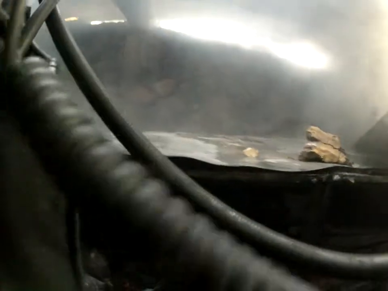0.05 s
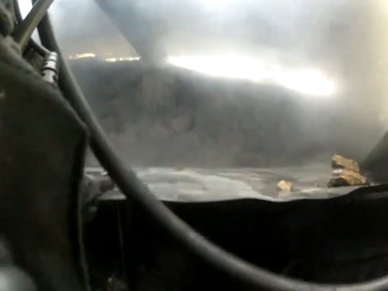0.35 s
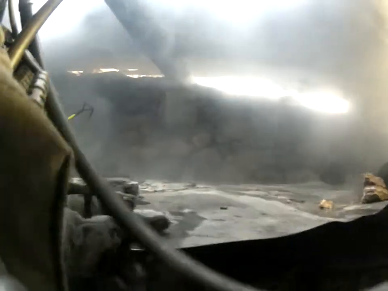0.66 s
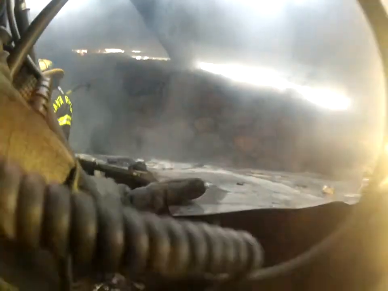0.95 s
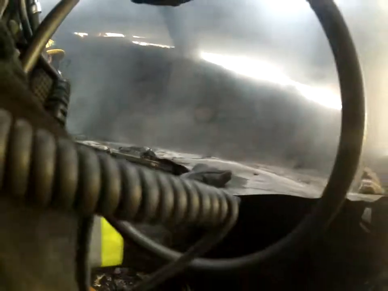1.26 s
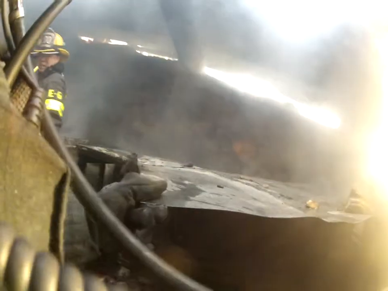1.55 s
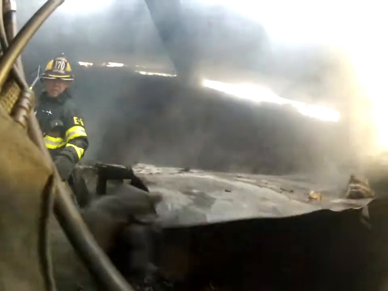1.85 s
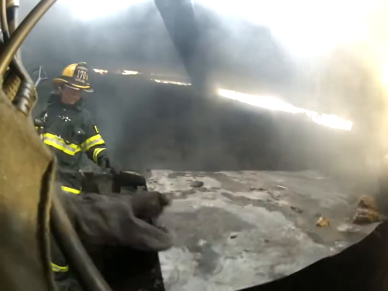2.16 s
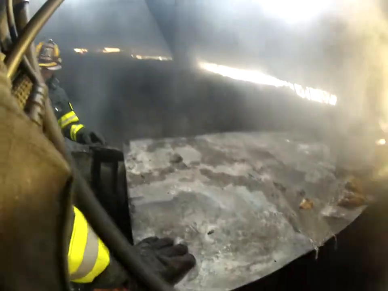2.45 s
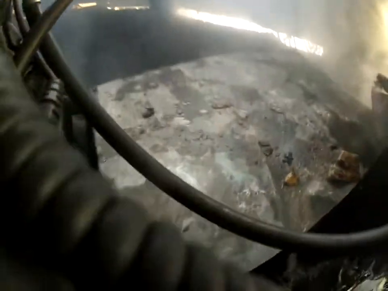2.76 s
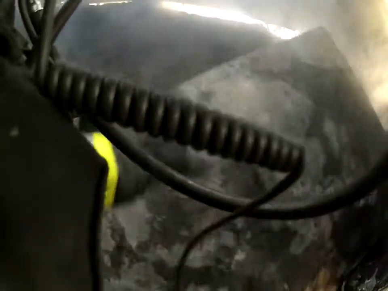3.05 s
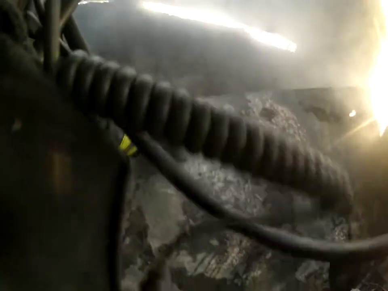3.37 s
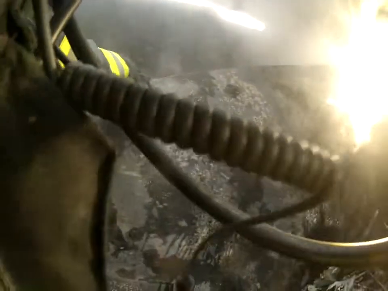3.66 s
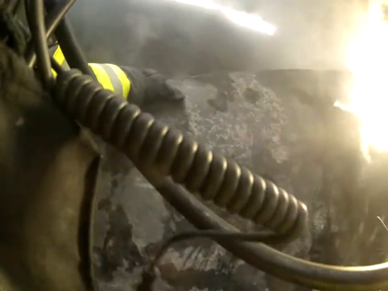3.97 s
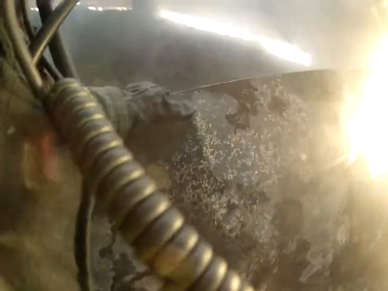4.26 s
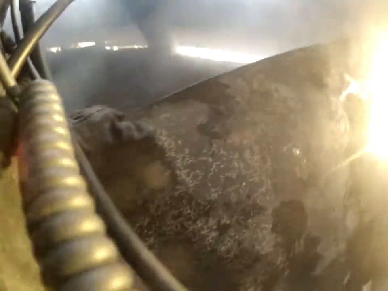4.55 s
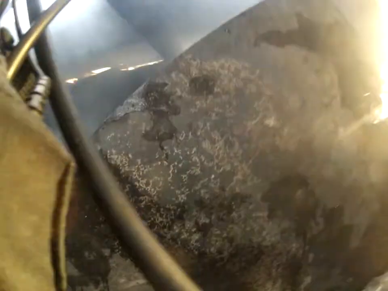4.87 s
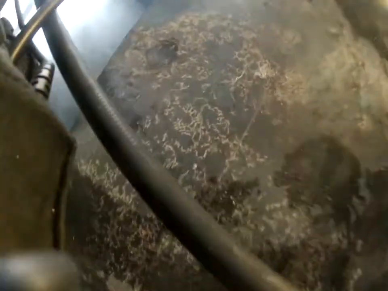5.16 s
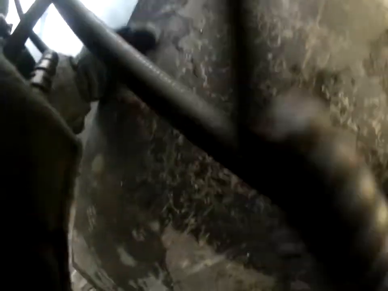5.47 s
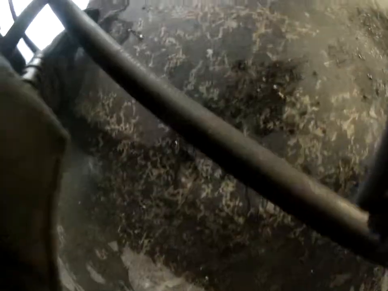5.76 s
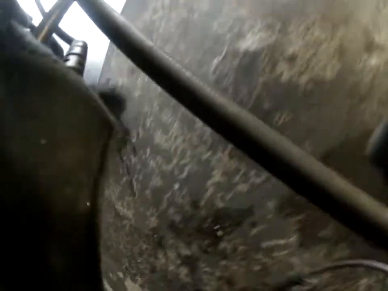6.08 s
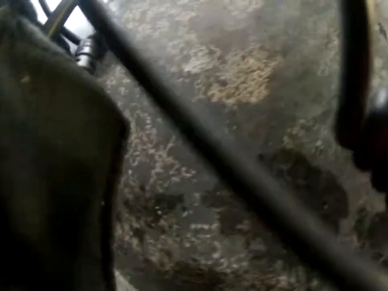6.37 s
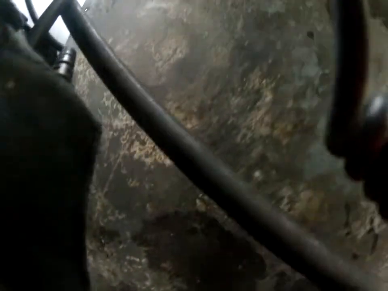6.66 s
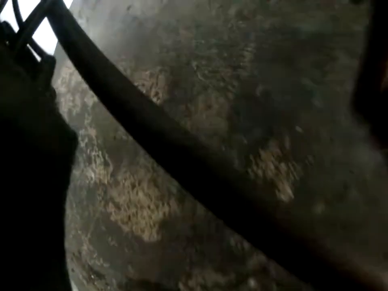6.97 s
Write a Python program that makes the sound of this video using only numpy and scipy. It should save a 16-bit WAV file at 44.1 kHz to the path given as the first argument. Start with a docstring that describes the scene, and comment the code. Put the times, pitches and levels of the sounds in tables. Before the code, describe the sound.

A faint, wavering hiss and the low rub of shifting gear run throughout, heard very close on a helmet camera inside a burned building. Two hard clacks hit the housing around 0.4 seconds, followed by soft bumps, short scrapes and small metal clinks, with another knock at 2.5 seconds. At about 3 seconds a fitting clinks, a metal sheet knocks dully, and grit slides off it in a rush that rings the sheet and fades by 3.9 seconds. After a few soft thumps, a sharp knock at 4.8 seconds starts a busy run of clacks and scrapes, strong near 5.3 and 5.7 seconds. From 6 seconds a hose judders across the camera in stuttering thuds while the cloth rubbing grows. A cluster of loud knocks comes at about 7 seconds. The hardest hits overload, briefly dip the level and have a gritty treble edge.

```python
"""Inside a burned building, heard from a helmet camera. Over a faint hiss and the rub of shifting gear,
fittings clink, soft bumps thump the camera, a hose judders across it and hard gear clacks on its housing.
Midway, a tilted metal sheet knocks, and grit slides off it in a brief rush that sets it ringing.
The recorder overloads on the knocks, ducks after them, and holds each sample,
which mirrors the sound into the treble."""
import sys
import numpy as np
from scipy import signal
from scipy.fft import rfft, irfft, next_fast_len
from scipy.io import wavfile
from scipy.ndimage import map_coordinates

SR = 44100
rng = np.random.default_rng(int(sys.argv[2]) if len(sys.argv) > 2 else 0)


def store_wav(level_fs):
    """Save 16-bit WAV to argv[1]."""
    pcm = np.round(np.clip(np.atleast_2d(level_fs), -1, 1) * 32767)
    wavfile.write(sys.argv[1], SR, pcm.T.astype(np.int16))


N = 313992


def amp(db):
    """Decibels to gain."""
    return 10 ** (np.asarray(db) / 20)


def unit(x):
    """Scale to rms 1."""
    return x / np.sqrt(np.mean(x ** 2) + 1e-20)


def colour(points, hz):
    """An EQ curve: the gain of (Hz, dB) points joined on a log axis."""
    freqs, db = np.transpose(points)
    return amp(np.interp(np.log(hz + 1), np.log(freqs + 1), db))


def curves(rows):
    """Fader moves: one value per sample for each column after the time."""
    times, *columns = np.transpose(rows)
    return [np.interp(np.arange(N) / SR, times, column) for column in columns]


def wobble(rate):
    """A smooth random curve, rate knots a second."""
    knots = rng.standard_normal(int(N * rate / SR) + 4)
    return map_coordinates(knots, [np.arange(N) * rate / SR])


def filtered(x, response):
    """Shape x by a gain that depends on frequency."""
    size = next_fast_len(len(x) + 8192)
    return irfft(rfft(x, size) * response(np.fft.rfftfreq(size, 1 / SR)), size)[:len(x)]


def add(track, start, sound):
    """Mix a sound into the track, start seconds in."""
    part = track[max(round(start * SR), 0):][:len(sound)]
    part += sound[:len(part)]


def grains(size, rate, spread_db):
    """Tiny random contacts of uneven strength, rate a second, rms 1."""
    hit = rng.random(size) < rate / SR
    return unit(hit * rng.standard_normal(size) * amp(spread_db * rng.standard_normal(size)))


def ring(t, hz, t60, attack):
    """One damped mode; t60 and attack in seconds."""
    return np.sin(2 * np.pi * hz * t) * amp(-60 * t / t60) * (1 - np.exp(-t / attack))


# tone of the hiss (frequency [Hz], gain [dB])
HISS_EQ = [(300, -1), (900, -6.5), (1100, 4.5), (1400, 0), (1640, 11), (1880, 2), (2100, 8), (2400, 8),
           (2700, 4.5), (3100, -2.5), (3550, 1), (4200, -13.5), (5300, -8), (6000, -15.5)]

def hiss(level_db=-39.5, waver_db=1.62):
    """A thin, restless bed, coloured by the cavity at the microphone; it sinks when the gear is still."""
    _, rub_db = curves(np.vstack(GEAR_MOVES))
    lull_db = 0.85 * np.minimum(rub_db + 45.5, 0)
    air = unit(filtered(rng.standard_normal(N), lambda hz: colour(HISS_EQ, hz)))
    return air * amp(level_db + lull_db + waver_db * wobble(rate=9.4))


# tone of the mount's rumble and of the cloth on it (frequency [Hz], gain [dB])
SWAY_EQ = [(12, -64), (30, -2), (60, -6), (110, -11), (180, -18), (400, -40.5), (800, -68)]
RUB_EQ = [(60, -35), (120, 8), (165, 8.5), (230, 11), (320, 3), (500, -3), (750, -4.5), (1100, -5.5),
          (1500, -37.5), (4000, -35.5), (6000, -66)]
# gear shifting, one list before the grit slide and one after (time [s], sway fader [dB], rub fader [dB])
GEAR_MOVES = [
    [(0.0, -41.5, -47.5), (0.24, -46, -50), (0.66, -38.5, -39), (0.84, -54, -46), (1.02, -46.5, -44.5),
     (1.43, -44, -46), (1.6, -44, -49), (1.94, -35.5, -45), (2.07, -39.5, -36), (2.26, -39, -50.5),
     (2.52, -55, -50.5), (2.83, -51, -48.5), (3.0, -44, -47)],
    [(3.75, -46.5, -47.5), (4.02, -47.5, -54.5), (4.19, -47.5, -46), (4.36, -49, -42), (4.65, -37.5, -48.5),
     (4.84, -33.5, -37), (5.18, -41, -38), (5.75, -39, -38), (5.97, -60, -27.5), (6.24, -37, -27.5),
     (6.52, -36.5, -37.5), (6.72, -43, -44), (7.12, -34, -23)],
]

def handling(sway_trim_db=2.5, rub_trim_db=-0.5):
    """The mount sways in lumps, and cloth rubs on it in the same uneven pushes."""
    sway_db, rub_db = curves(np.vstack(GEAR_MOVES))
    push = wobble(rate=19)
    sway = unit(filtered(rng.standard_normal(N), lambda hz: colour(SWAY_EQ, hz)))
    rub = unit(filtered(grains(N, rate=1100, spread_db=1), lambda hz: colour(RUB_EQ, hz)))
    sway *= amp(sway_db + sway_trim_db + 5.5 * push)
    rub *= amp(rub_db + rub_trim_db + 2.8 * push)
    return sway + rub


# modes of a metal fitting (frequency [Hz], level [dB], t60 [s])
FITTING_MODES = [(2700, 5, 0.11), (2930, 15, 0.018), (3614, 16.5, 0.028), (4030, 9, 0.036),
                 (4230, 4, 0.017), (5710, 8.5, 0.025)]
# fittings touching (time [s], gain [dB], pitch [ratio])
CLINK_CUES = [(.862, -47, 1), (0.884, -47, 1), (0.976, -52, 1.44), (1.6865, -38.5, 0.78),
              (1.697, -45, 0.63), (3.0057, -31.5, 0.93), (3.9083, -46.5, 0.94), (3.9935, -48, 0.9),
              (6.91, -37, 0.92)]

def clinks():
    """A small metal fitting rings briefly, with a new balance of modes at every touch."""
    out, t = np.zeros(N), np.arange(SR // 8) / SR
    for start, gain_db, pitch in CLINK_CUES:
        scatter_db = 2 * rng.standard_normal(len(FITTING_MODES))
        tones = [amp(db + offset_db) * ring(t, hz * pitch, t60, attack=0.000074)
                 for (hz, db, t60), offset_db in zip(FITTING_MODES, scatter_db)]
        add(out, start, amp(gain_db - 0.5) * sum(tones))
    return out


# tone of contact noise heard through the housing (frequency [Hz], gain [dB])
CONTACT_EQ = [(60, 15.5), (200, 12), (500, 4), (800, -8.5), (1100, -5.5), (1350, -8.5), (1650, -3.5),
              (2000, -8.5), (2600, -4), (3100, -12.5), (3500, -7), (4300, -15.5), (6000, -15.5)]
# short noisy sounds: scrapes, jingling fittings, a crack of grit, a thud's low ring
# (time [s], length [s], opening level [dB], centre [Hz], width [octaves])
BURST_CUES = [(0.806, 0.064, -30.5, 248, 2.7), (1.024, 0.039, -31.5, 410, 0.72),
              (1.22, 0.018, -24.5, 1820, 1.17), (1.961, 0.027, -25.5, 600, 7.5),
              (2.292, 0.033, -37, 2600, 1.2), (3.004, 0.045, -29, 3400, 1.34),
              (3.178, 0.032, -21, 4630, 0.83), (3.989, 0.098, -42, 3430, 0.65),
              (4.186, 0.028, -33.5, 335, 0.19), (4.345, 0.062, -34.5, 217, 0.46),
              (4.436, 0.039, -30, 450, 1.1), (5.28, 0.055, -23, 1140, 1.05),
              (5.46, 0.088, -25.5, 1390, 0.75), (5.809, 0.09, -22.5, 950, 1.36),
              (5.83, 0.1, -28.5, 230, 0.88), (6.044, 0.027, -22, 770, 0.35),
              (6.296, 0.034, -21.5, 1240, 0.78), (6.312, 0.025, -11, 159, 0.18),
              (6.99, 0.096, -19.5, 1400, 1.1)]

def noisy_bursts(fade_db=5.5):
    """Each short noisy sound is a fading run of tiny contacts, filtered to its own band."""
    out, t = np.zeros(N), np.arange(SR // 4) / SR
    for start, length, db, centre_hz, octaves in BURST_CUES:
        band = lambda hz: np.exp(-0.5 * (np.log2((hz + 1) / centre_hz) / octaves) ** 2)
        contacts = grains(len(t), rate=3600, spread_db=1)
        burst = unit(filtered(contacts, lambda hz: band(hz) * colour(CONTACT_EQ, hz)))
        envelope = (1 - np.exp(-t / 0.00033)) * np.exp(-np.maximum(t - length, 0) / 0.0078)
        add(out, start, burst * envelope * amp(db - fade_db * np.minimum(t / length, 1)))
    return out


def patter(rate, decay_s, spots):
    """Grains land on a few spots of the metal; each spot has its own brief, dense ring."""
    age = np.arange(SR // 20) / SR
    rings = rng.standard_normal((spots, len(age))) * np.exp(-age / decay_s)
    return sum(signal.oaconvolve(grains(N, rate, spread_db=2), spot)[:N] for spot in rings)


# resonances of the metal sheet (frequency [Hz], width [Hz], level [dB])
SHEET_MODES = [(342, 28, -10.5), (671, 34, 4.5), (1130, 27, 0), (1693, 130, -2), (2480, 380, -5),
               (3460, 210, -16)]
# tone of the grit (frequency [Hz], gain [dB])
GRIT_EQ = [(60, -15), (150, 7), (300, 4), (450, 0.5), (650, -4), (870, -6), (1100, -2), (1400, -2.5),
           (1700, -6.5), (2600, -12), (3600, -16), (4500, -22.5), (6000, -21)]
# swell of each grain size, coarse to fine (peak delay [s], peak level [dB], rise [dB/s], fall [dB/s])
GRIT_SWELLS = [(0.12, -20.5, 53, 52.5), (0.22, -28.5, 54, 49), (0.16, -29, 20, 37)]

def grit_slide(start_s=3.068, end_s=3.85, attack_s=0.0047, release_s=0.068):
    """Grit pours off the tilted sheet and rings it: each grain size swells to its own peak, then thins."""
    def sheet(hz):
        modes = sum(amp(db / 2) / (1 + 2j * (hz - centre) / width) for centre, width, db in SHEET_MODES)
        return 0.47 + np.abs(modes) ** 2

    out, age = np.zeros(N), np.arange(N) / SR - start_s
    pouring = np.clip(np.minimum(age / attack_s, (end_s - start_s - age) / release_s), 0, 1)
    contacts = patter(rate=220, decay_s=0.0067, spots=8)
    edges_hz = [125, 800, 2500, 6000]  # one band per grain size
    for (delay, peak_db, rise, fall), low, high in zip(GRIT_SWELLS, edges_hz, edges_hz[1:]):
        level_db = peak_db - np.maximum(rise * (delay - age), fall * (age - delay))
        band = lambda hz: 1 / np.sqrt((1 + (low / (hz + 1)) ** 8) * (1 + (hz / high) ** 8))
        rush = unit(filtered(contacts, lambda hz: colour(GRIT_EQ, hz) * sheet(hz) * band(hz)))
        out += amp(level_db) * rush
    return out * pouring


# modes of the camera's plastic shell (frequency [Hz], level [dB], t60 [s])
SHELL_MODES = [(607, -6.5, 0.034), (993, 3, 0.009), (1554, -2.5, 0.019), (2177, -2, 0.0092),
               (2702, -10, 0.017), (3500, -16.5, 0.02), (4530, -13.5, 0.0019)]

def blow(thud_hz, thud_db, panel_hz, panel_db, shell_db, thud_cycles):
    """A blow rocks the camera on its mount, rings the struck panel and rattles the whole shell."""
    t = np.arange(SR // 10) / SR
    scatter = rng.standard_normal(len(SHELL_MODES))
    thud = amp(thud_db) * ring(t, thud_hz, t60=thud_cycles / thud_hz, attack=0.43 / thud_hz)
    # higher panel modes die sooner
    panel = amp(panel_db) * ring(t, panel_hz, t60=0.011 * (1200 / panel_hz) ** 0.29, attack=0.00044)
    shell = sum((-1) ** k * amp(db + 3.85 * scatter[k]) * ring(t, hz, t60, attack=0.00003)
                for k, (hz, db, t60) in enumerate(SHELL_MODES))
    # the surfaces chatter for a few milliseconds, too soft to give much top end
    chatter_eq = lambda hz: colour(CONTACT_EQ, hz) / np.hypot(1, (hz / 3500) ** 4)
    chatter = unit(filtered(rng.standard_normal(len(t)), chatter_eq))
    chatter *= (amp(panel_db - 17.5) + amp(shell_db - 4.5)) * np.exp(-t / 0.0033)
    # the helmet under the mount adds a soft, low tail
    helmet = amp(thud_db - 27) * ring(t, hz=158 * np.exp(0.204 * scatter[0]), t60=0.063, attack=0.0073)
    # the small housing gives off little bass
    low_cut = signal.butter(2, 464, "high", fs=SR, output="sos")
    housing = signal.sosfilt(low_cut, panel + amp(shell_db) * shell + chatter)
    return -(thud + housing + helmet)


def soft_blow(thud_hz, thud_db):
    """A dull blow is mostly thud; panel and shell answer faintly."""
    answer_db = 0.7 * thud_db
    panel_hz = 1102 * np.exp(0.36 * rng.standard_normal())
    return blow(thud_hz, thud_db, panel_hz, answer_db - 18, answer_db - 29, thud_cycles=3.14)


def cord_taps(per_second=4.2, thud_hz=216, over_rub_db=21, spread_db=2):
    """The dangling cord taps at random, harder when the gear shifts more."""
    out = np.zeros(N)
    _, rub_db = curves(np.vstack(GEAR_MOVES))
    count = round(per_second * N / SR)
    for at, (pitch, strength) in zip(rng.integers(N, size=count), rng.standard_normal((count, 2))):
        thud_db = rub_db[at] + over_rub_db + spread_db * strength
        add(out, at / SR, soft_blow(thud_hz * np.exp(0.35 * pitch), thud_db))
    return out


# dull thumps (time [s], thud pitch [Hz], thud level [dB])
THUMP_CUES = [(0.5125, 387, 8.5), (0.6493, 360, 1.5), (1.1381, 78, -5.5), (1.5125, 99, -12.5),
              (2.006, 81.5, -4), (2.0576, 102, -3.5), (2.183, 124, -10.5), (3.075, 226, 0),
              (4.296, 141, -10.5), (4.4361, 397, -5), (4.691, 135, -2), (4.762, 72, -3), (5.517, 120, -2.5),
              (5.9756, 245, 6.5), (6.1075, 500, 5.5), (6.201, 174, -1), (6.3925, 272, 4.5),
              (6.7074, 186, 4)]

def dull_thumps():
    """Soft bumps on the camera, and the sheet's knock as the grit starts sliding."""
    out = np.zeros(N)
    for start, hz, db in THUMP_CUES:
        add(out, start, soft_blow(hz, db))
    return out


# the hose catching on the housing (time [s], first thud pitch [Hz], first thud level [dB])
JUDDER_CUES = [(6.0519, 268, 11), (6.1205, 273, 16), (6.2964, 276, 13.5), (6.9929, 323, 5)]

def hose_judders(slips=3, gap_s=0.0096, jitter_s=0.00103, pitch_ratio=0.79, loss_db=1.5):
    """The hose sticks and slips as its tension lets go, each slip lower and weaker than the last."""
    out = np.zeros(N)
    for start, hz, db in JUDDER_CUES:
        for k in range(slips):
            slip_time = start + k * gap_s + min(k, 1) * jitter_s * rng.standard_normal()
            add(out, slip_time, soft_blow(hz * pitch_ratio ** k, db - k * loss_db))
    return out


# hard hits on the housing
# (time [s], thud pitch [Hz], thud level [dB], panel pitch [Hz], panel level [dB], shell gain [dB])
KNOCK_CUES = [(0.1503, 300, -20, 1060, -15, -23), (0.3933, 300, 20, 1330, 11, 3),
              (0.4532, 380, 19.5, 1460, -5, -5.5), (1.145, 171, -15, 1625, 2, -15),
              (1.5736, 750, -15, 2510, -0.5, -5.5), (1.7958, 428, -37, 1000, -8.5, -19),
              (1.8903, 140, -1, 2240, -10, -24), (2.5313, 406, 10, 1020, 7, -7),
              (4.803, 303, 20, 2554, 18, 0.5), (4.837, 603, 10, 1080, 1.5, -28),
              (4.8553, 210, -4, 1040, -5.5, -15.5), (4.901, 255, 5.5, 782, -2.5, -19.5),
              (5.0112, 350, 4, 1704, 8.5, -14.5), (5.0404, 167, -6.5, 940, -10, -33),
              (5.223, 231, -4, 980, -5.5, -21.5), (5.2763, 282, 6.5, 704, 2.5, -4.5),
              (5.3051, 470, 16, 1110, 3.5, -10), (5.3306, 241, 12.5, 1860, 12, -7),
              (5.623, 251, -4, 1860, -8.5, -20), (5.683, 347, 22, 1063, 16.5, -0.5),
              (5.758, 403, 3.5, 1130, 0, -13), (5.8253, 275, 17.5, 1600, 2.5, -8.5),
              (6.4195, 263, 13.5, 1002, 16.5, 1), (6.4984, 222, 10, 750, -4.5, -12),
              (6.817, 216, 13, 1016, -2.5, -47), (7.0447, 423, 14.5, 1240, 0, -12),
              (7.0507, 447, 7, 1050, 4.5, 2.5), (7.0655, 148, 21, 2530, 19.5, 5),
              (7.1165, 300, 24, 1746, 25.5, -11)]

def gear_knocks():
    """Hard gear clacks on the housing, each time on a different spot with its own pitch."""
    out = np.zeros(N)
    for start, thud_hz, thud_db, panel_hz, panel_db, shell_db in KNOCK_CUES:
        add(out, start, blow(thud_hz, thud_db, panel_hz, panel_db, shell_db, thud_cycles=2.37))
    return out


def scene():
    """Hits and textures meet at one microphone, which feeds both channels."""
    hits = gear_knocks() + dull_thumps() + hose_judders() + clinks()
    mono = hits + noisy_bursts() + handling() + hiss() + grit_slide() + cord_taps()
    return np.array([mono, mono])


def duck(x, threshold, depth, release_s, lag_s):
    """Gain control: a moment after an overload the gain drops, then creeps back."""
    overshoot = np.clip(np.abs(x) - threshold, 0, 1)
    pole = np.exp(-1 / (release_s * SR))
    envelope = signal.lfilter([1 - pole], [1, -pole], overshoot)
    t = np.arange(N) / SR
    return x / (1 + depth * np.interp(t - lag_s, t, envelope))


def sample_and_hold(x, rate_hz):
    """Holding each sample mirrors the sound into the treble, on both sides of the hold rate."""
    band_limited = filtered(x, lambda hz: 1 / np.sqrt(1 + (2 * hz / rate_hz) ** 20))
    images = 1 + 2 * np.cos(2 * np.pi * rate_hz * np.arange(N) / SR)
    return filtered(band_limited * images, lambda hz: np.sinc(hz / rate_hz))


def record(dry):
    """The camera's chain: bass roll-off, ducking, overload, sample-and-hold and a steep high cut."""
    x = filtered(dry[0], lambda hz: 1j * hz / (1j * hz + 24))
    x = duck(x, threshold=0.67, depth=57, release_s=0.036, lag_s=0.00378)
    x = x / (1 + np.abs(x) ** 8) ** (1 / 8)  # soft clip
    x = np.clip(sample_and_hold(x, rate_hz=12000), -1, 1)
    high_cut = signal.ellip(10, 0.3, 95, 15300, fs=SR, output="sos")
    x = signal.sosfilt(high_cut, x)
    return np.array([x, x])


dry = scene()
out = record(dry)
store_wav(out)
```